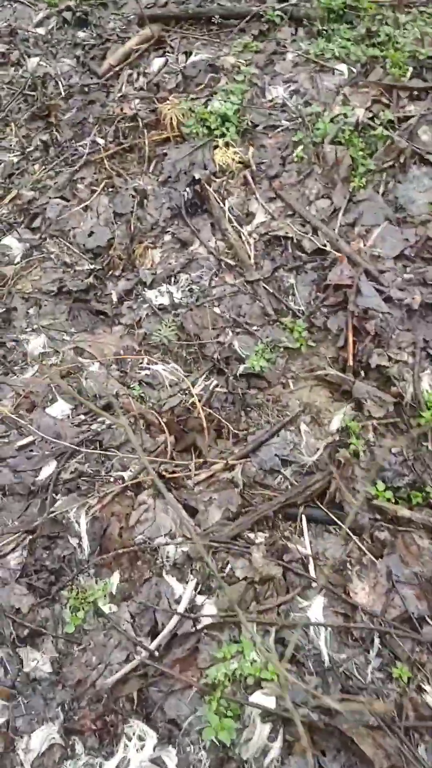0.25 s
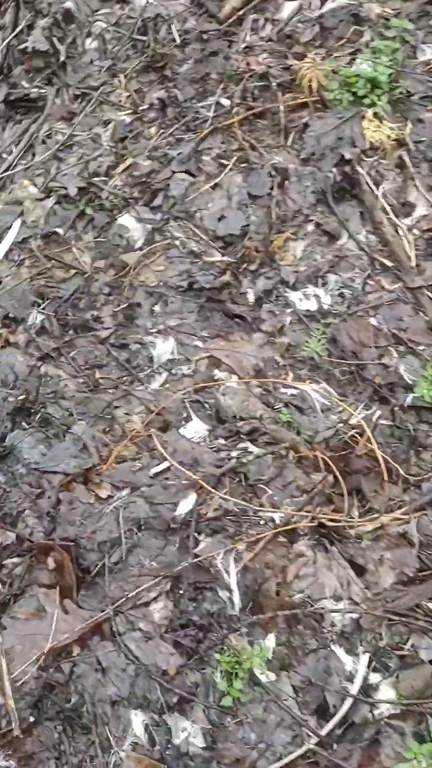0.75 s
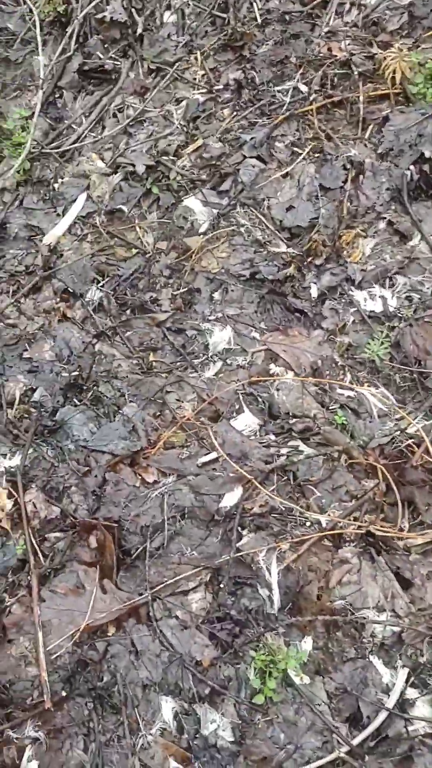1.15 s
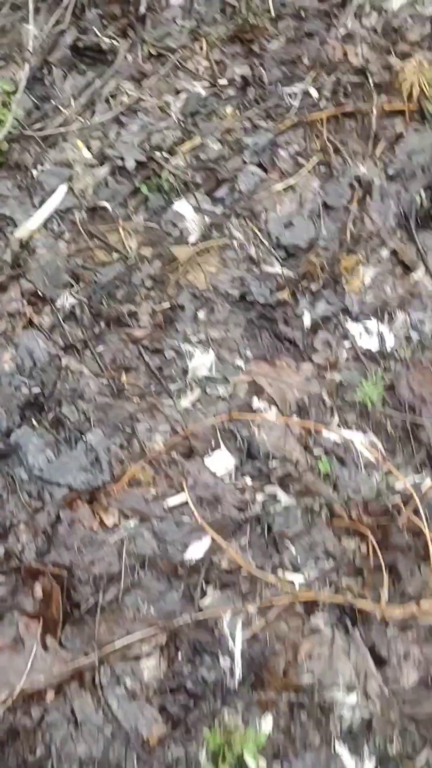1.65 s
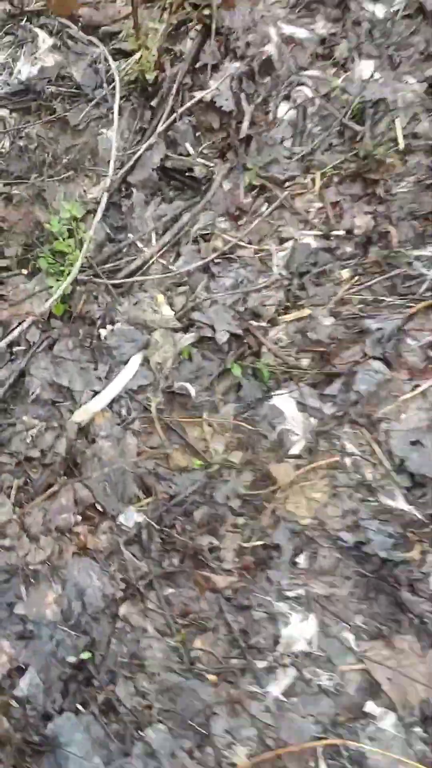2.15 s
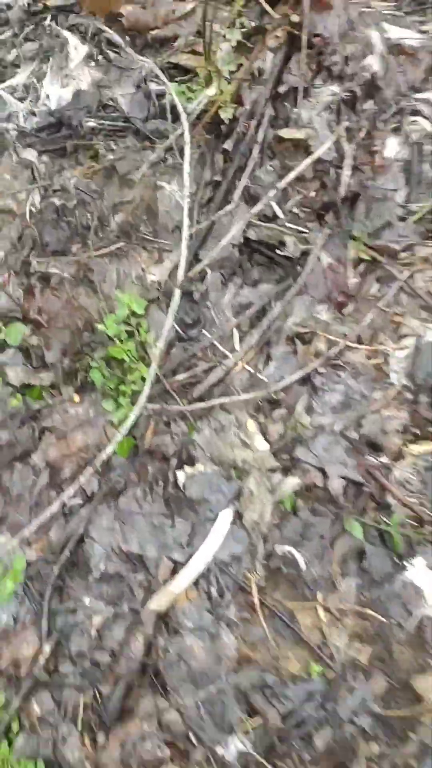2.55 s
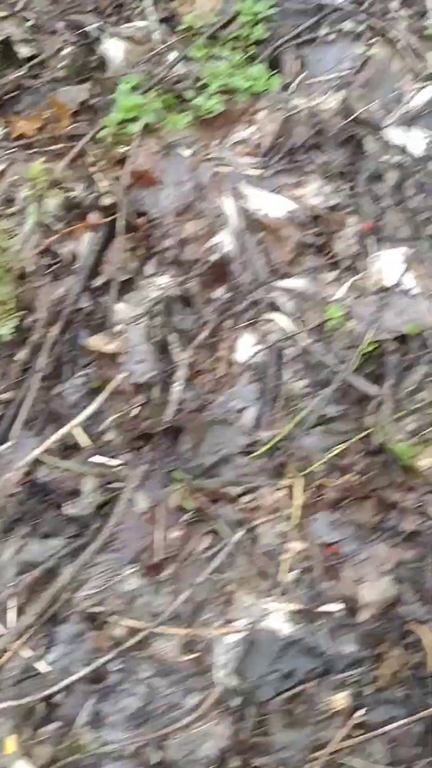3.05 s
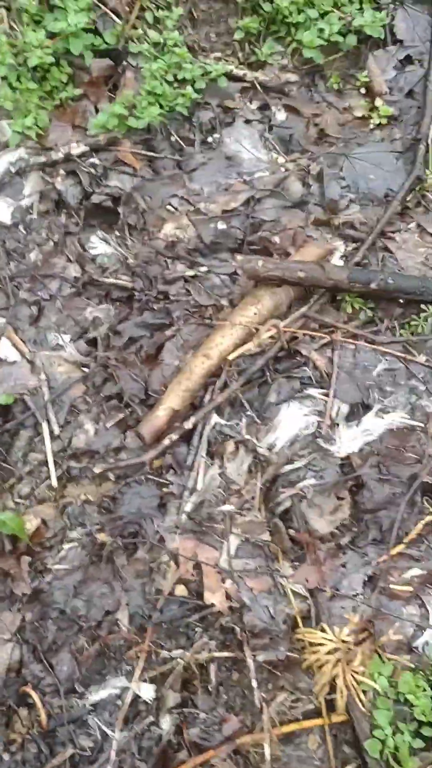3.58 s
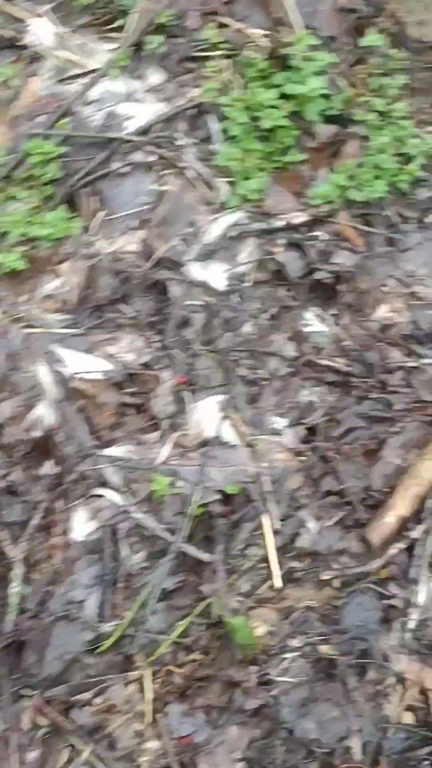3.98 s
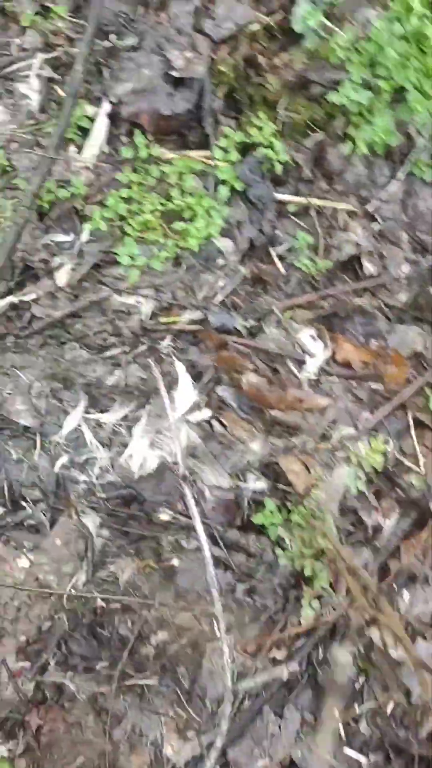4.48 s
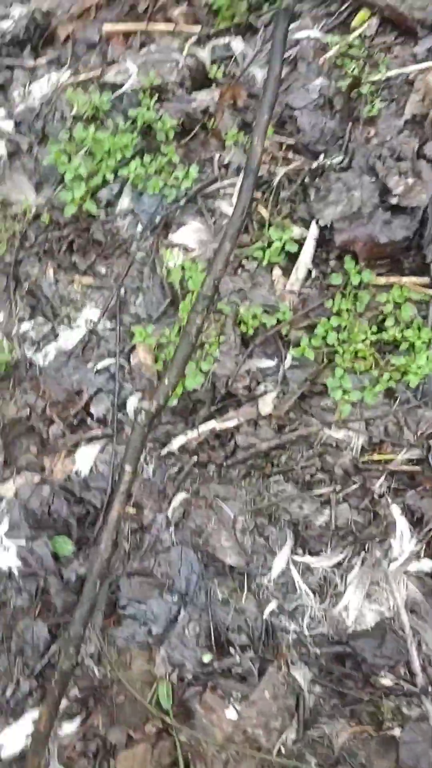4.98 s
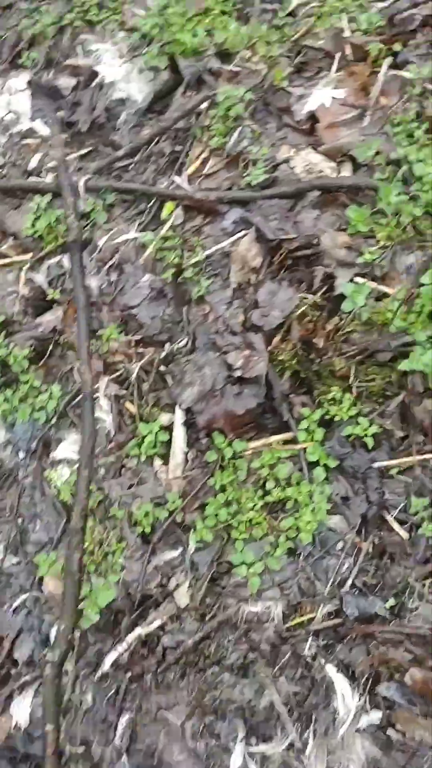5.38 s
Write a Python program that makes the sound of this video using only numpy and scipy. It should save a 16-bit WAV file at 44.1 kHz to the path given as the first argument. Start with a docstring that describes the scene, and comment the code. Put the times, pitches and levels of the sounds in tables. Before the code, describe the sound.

Slow, close footsteps on a damp forest floor, with small twigs snapping and wet leaves rustling and squashing softly.

```python
"""A damp forest floor: slow footsteps, close, from two microphone ports held above the feet.
Twigs and stems snap, the litter cracks faintly, wet pockets pop, wet leaves rustle and squash in swells.
A faint far hum and the air of the wood lie below. The left port faces the ground and hears the feet
first and brighter; the right port hears them late and shadowed."""
import sys
import numpy as np
from scipy import signal
from scipy.fft import rfft, irfft, next_fast_len
from scipy.io import wavfile
from scipy.ndimage import uniform_filter1d

SR = 44100
rng = np.random.default_rng(int(sys.argv[2]) if len(sys.argv) > 2 else 0)


def digitize_waveform(pressure):
    """Quantize a signal to 16-bit integers and store it at the path in sys.argv[1].

    Rows of a 2-D input are taken as channels; values are limited to [-1, 1].
    """
    field = np.atleast_2d(pressure).T
    bounded = np.clip(field, -1, 1)
    quanta = np.round(bounded * 32767).astype(np.int16)
    wavfile.write(sys.argv[1], SR, quanta)


N = 248283

# twigs and stems breaking underfoot: (time [s], tick level [dB], crack level [dB], crack pitch [Hz],
# body level [dB], body pitch [Hz], knock level [dB], knock pitch [Hz])
TWIG_SNAPS = [(0.2209, -34, -32, 7800, -33.5, 2390, -43, 373),
              (0.2219, -36, -19, 6500, -43, 3040, -44, 390), (0.2288, -24, -24, 3900, -41, 3900, -39, 366),
              (0.308, -33.5, -28.5, 5300, -34.5, 4200, -42.5, 560),
              (0.4793, -37, -35, 5840, -41.5, 2280, -43, 910),
              (0.5108, -33.5, -29, 3580, -35, 2070, -44.5, 820),
              (0.599, -30, -27.5, 5430, -42, 1030, -35.5, 1015),
              (0.7312, -26, -22, 5530, -32, 3920, -36, 703),
              (0.883, -61, -38, 4400, -43, 1380, -49.5, 1190),
              (1.2149, -47, -24.5, 8790, -34, 1820, -37, 695),
              (1.231, -36, -24, 7300, -40, 1280, -39.5, 625),
              (1.285, -24, -15.5, 6910, -23, 2470, -34, 474),
              (1.3694, -11.5, -15.5, 6380, -22.5, 1946, -25.5, 637),
              (1.7422, -35, -21, 9600, -42.5, 4140, -58, 470),
              (1.802, -23, -15.5, 4990, -34.5, 2490, -36, 670),
              (1.8557, -24.5, -22, 4970, -39, 2550, -47, 1000),
              (1.879, -40, -25, 7260, -42, 2900, -41.5, 437), (1.904, -24, -30, 9600, -39, 2280, -35, 895),
              (1.917, -21.5, -17, 8580, -25, 1240, -26, 1160),
              (1.939, -25.5, -16.5, 5260, -23, 2410, -40, 510),
              (2.239, -58, -47, 4000, -36, 1720, -45, 490),
              (2.3451, -53, -32.5, 6640, -40.5, 1960, -33, 870),
              (2.557, -19.5, -7, 5542, -26.5, 1750, -27.5, 367),
              (2.58, -47, -19.5, 4530, -32, 2810, -48, 920),
              (2.592, -20.5, -20.5, 5300, -41, 1480, -27, 662),
              (2.9868, -30, -15, 7840, -24, 2080, -42, 437),
              (3.072, -59, -33, 7870, -30.5, 1780, -32.5, 1215),
              (3.199, -33, -18.5, 4553, -33.5, 2430, -28, 1210),
              (3.6902, -30, -25.5, 6900, -33.5, 1260, -34.5, 333),
              (3.782, -15, -23, 5320, -22.5, 2940, -38, 385),
              (3.8096, -25.5, -31, 9050, -40, 2700, -55, 400),
              (3.819, -42, -15, 8580, -34.5, 2420, -38, 430), (3.836, -39, -20, 8100, -43, 3080, -49, 385),
              (3.8427, -33, -21, 7600, -55, 2960, -32, 695),
              (4.0026, -40, -25.5, 8300, -34, 1340, -37, 455), (4.61, -61, -30, 7000, -38, 2350, -41, 470),
              (4.816, -39.5, -38, 3790, -43, 1890, -47, 810), (4.9452, -37, -30, 4400, -40, 2770, -48, 790),
              (4.9633, -21.5, -13.5, 7370, -26.5, 2580, -28, 530),
              (5.19, -61, -33, 3620, -53, 1240, -36, 930), (5.2395, -28, -21.5, 3320, -25, 1570, -33, 1020),
              (5.3556, -35, -29.5, 7740, -31, 1390, -36.5, 1020),
              (5.441, -26, -45, 8950, -40, 2890, -41.5, 561),
              (5.447, -46, -33, 7060, -40.5, 2480, -44, 1042),
              (5.5501, -46, -24.5, 6900, -40.5, 3260, -72, 993)]
# wet pockets bursting under the sole: (time [s], level [dB], pitch [Hz])
WET_POPS = [(0.132, -46.5, 580), (0.263, -42.5, 254), (0.322, -45, 636), (1.132, -34, 280),
            (1.0764, -41, 487), (1.1562, -36, 940), (1.474, -32.5, 430), (1.505, -37.5, 400),
            (1.5215, -37.5, 397), (1.601, -43.5, 250), (2.038, -39.5, 189), (2.23, -43.5, 330),
            (2.561, -34.5, 165), (3.8455, -46, 730), (3.8542, -34.5, 780), (3.8742, -38, 810),
            (3.941, -39.5, 294), (4.247, -48, 654), (4.628, -46.5, 394), (5.33, -41, 460),
            (5.3865, -43, 252), (5.402, -37, 350)]
# faint, short cracks and ticks in the litter underfoot, and at 2.5635 s a faint echo off the ground of the loud
# snap just before: (time [s], level [dB], pitch [Hz])
FAINT_CRACKS = [(0.0075, -36, 4430), (0.0125, -36.5, 7840), (0.1302, -38.5, 5600), (0.4405, -42.5, 7900),
                (0.4674, -53, 7340), (1.078, -40.5, 2180), (1.109, -37, 2960), (1.226, -35.5, 4500),
                (1.4283, -42.5, 2800), (2.042, -44, 7550), (2.1515, -40.5, 4030), (2.2455, -39, 2630),
                (2.266, -41.5, 5100), (2.5635, -42, 6500), (3.048, -40, 8240), (3.14, -47, 6740),
                (3.16, -49, 7640), (3.181, -35.5, 7040), (3.347, -41.5, 4000), (3.441, -33.5, 7740),
                (3.5142, -36, 2180), (3.581, -38.5, 5100), (3.6996, -40, 4560), (3.8165, -32, 9000),
                (3.877, -48, 5670), (3.9154, -43.5, 3350), (4.0526, -34, 5030), (4.1375, -42.5, 2800),
                (4.5786, -38.5, 6900), (4.6135, -40, 3400), (4.6275, -44, 5460), (4.685, -46.5, 7000),
                (4.9046, -41.5, 2600), (5.205, -38, 11400), (5.321, -44, 4100), (5.334, -39, 7700),
                (5.3495, -32, 4880), (5.4312, -34, 5430)]
# where the foot is, heard as lag at the right port: (time [s], lag [ms])
FOOT_LAG = [(0, 0.31), (1.2, 0.49), (1.9, 0.4), (2.3, 0.5), (3.1, 0.54), (3.9, 0.37), (4.98, 0.34),
            (5.2, 0.43)]
# the sole pressing into the leaves:
# (time of full pressure [s], hold [s], relative rustle level [dB], relative squash level [dB])
SOLE_PRESSES = [(0.005, 0.0037, -52, -48.5), (0.165, 0.031, -52.5, -76), (0.217, 0.019, -48, -72),
                (0.453, 0.014, -57.5, -58), (0.922, 0.069, -58.5, -63), (1.108, 0.032, -45.5, -45),
                (1.46, 0.042, -65, -50), (1.883, 0.11, -53, -52), (2.231, 0.011, -56, -42.5),
                (2.553, 0.011, -48, -58), (3.063, 0.025, -54.5, -75), (3.413, 0.093, -55, -77),
                (3.796, 0.067, -49, -42.5), (4.614, 0.0084, -51, -55), (5.095, 0.017, -57.5, -78),
                (5.342, 0.079, -52, -58), (5.554, 0.012, -49, -44.5)]
# litter shifting under the walker: (time [s], relative rustle level [dB], relative squash level [dB])
LITTER_SHIFT = [(0.0, -69, -68), (0.3, -59.5, -58.5), (0.55, -66, -68), (0.7, -66, -66.5),
                (0.85, -61.5, -64.5), (1.2, -55, -63.5), (1.41, -57.5, -50), (1.58, -63.5, -55.5),
                (1.68, -54.5, -53.5), (2.1, -58, -53.5), (2.5, -59.5, -55.5), (2.98, -54.5, -54.5),
                (3.3, -63.5, -54), (3.72, -60.5, -58), (3.931, -54.5, -50), (4.32, -60, -51.5),
                (4.5, -68.5, -61.5), (4.68, -60.5, -59), (5.05, -56, -60.5), (5.17, -64.5, -58),
                (5.63, -54, -51.5)]
# spectrum of sliding leaves: (frequency [Hz], relative level [dB])
RUSTLE_SPECTRUM = [(400, -31), (800, -8), (3500, -2.5), (6000, 2.5), (7800, 4.5), (9500, 1.5), (15500, 0.5)]
# strength of the wet layers' resonances: (frequency [Hz], relative level [dB])
SQUASH_SPECTRUM = [(120, -15.5), (300, 0.5), (600, -3.5), (1300, 1.5)]
# shadow on the leaves at the right port: (frequency [Hz], gain [dB])
PORT_SHADOW = [(60, -4), (400, -1.5), (1300, -4), (4400, -5.5), (8000, -8.5), (15000, -4.5)]
# spectrum of the air in the wood: (frequency [Hz], relative level [dB])
AIR_SPECTRUM = [(20, -43), (50, -9.5), (80, 1.5), (110, 2.5), (200, -11.5), (1140, -19), (2200, -20.5),
                (8000, -19.5), (11000, -25.5), (15500, -25)]
# how alike the air is at the two ports: (frequency [Hz], correlation [0-1])
AIR_CORRELATION = [(60, 0.92), (300, 0.1), (1500, 0.031), (8000, 0.0067)]
# resonance of the far drone: (frequency [Hz], width [Hz], level [dB])
HUM_RESONANCES = [(86.6, 16, -76)]

CRACK_SHADOW_DB, BODY_SHADOW_DB, KNOCK_SHADOW_DB = -17, -7.5, -4   # at the right port
PRESS_S, LIFT_S = 0.051, 0.058   # a press swells, and dies, by 20 dB in these times
SHORT = 3000   # samples in one short sound
SHORT_T = np.arange(SHORT) / SR


def twig_snaps():
    """Twigs break close below the microphone: bright crack, woody body, dull knock, litter settling."""
    out = np.zeros((2, N))
    for s, tick_db, crack_db, crack_hz, body_db, body_hz, knock_db, knock_hz in TWIG_SNAPS:
        crack = 0.47 * burst(0.00029, 0.0034, 0.7 * crack_hz, min(1.616 * crack_hz, 16500))
        crack += 0.36 * tearing(crack_hz)
        tick = amp(tick_db) * (1.21 * click(6700, 15280) + 0.067 * burst(0.00048, 0.077, 7700, 15000))
        crack += amp(-32.5) * burst(0.00043, 0.1, 2200, 13600)   # the litter settles
        body = 1.1 * burst(0.0008, 0.007, 0.65 * body_hz, 1.5 * body_hz)
        body += 2.6 * ring(body_hz, t60=0.0055, glide=0.17)
        knock = dull_knock(knock_hz) + 0.31 * ring(201, t60=0.011, glide=0.98)   # low push of the weight
        scatter = burst(0.00013, 0.02, 0.42 * crack_hz, 11850)   # reaches the right port round the hand
        parts = amp([[crack_db], [body_db], [knock_db]]) * [crack, body, knock]
        right = amp([CRACK_SHADOW_DB, BODY_SHADOW_DB, KNOCK_SHADOW_DB]) @ parts
        right += amp(crack_db + CRACK_SHADOW_DB) * scatter
        right += amp(-8.5) * tick   # the very top bends past the shadow
        add_at_ports(out, s, parts.sum(axis=0) + tick, right)
    return out


def tearing(hz, peak_s=0.0013):
    """A crack runs through a stem: an unsteady tone that swells, sweeps down to its pitch and dies."""
    wobble = np.cumsum(rng.normal(0, 0.07, size=SHORT))
    sweep = 0.000495 * (1 - np.exp(-SHORT_T / 0.00056))
    envelope = (SHORT_T / peak_s * np.exp(1 - SHORT_T / peak_s)) ** 2.05
    return np.sin(2 * np.pi * hz * (SHORT_T + sweep) + wobble) * envelope


def burst(rise_s, t60, low_hz, high_hz):
    """Fibres tear in a spurt of noise that swells and dies, its highest treble first."""
    envelope = (1 - np.exp(-SHORT_T / rise_s)) ** 2 * amp(-60 * SHORT_T / t60)
    noise = rng.standard_normal(SHORT) * envelope
    spurt = falling(bandpass(noise, low_hz, high_hz, order=3), high_hz)
    return spurt / np.sqrt(uniform_filter1d(spurt ** 2, size=44).max() * 2)


def click(low_hz, high_hz):
    """One dry click falls through the band, three fibres giving way just after it."""
    impulses = np.zeros(SHORT)
    impulses[[0, *rng.integers(4, 40, size=3)]] = [1, *rng.uniform(-.45, .45, size=3)]
    x = falling(bandpass(impulses, low_hz, high_hz), high_hz)
    return x / np.abs(x).max()


def ring(hz, t60, glide, lag_s=0.00069):
    """A broken end rings briefly after lag_s, its pitch dropping as the crack opens."""
    t = np.maximum(SHORT_T - lag_s, 0)
    phase = 2 * np.pi * hz * (t + glide * 0.00067 * (1 - np.exp(-t / 0.00027)))
    return np.sin(phase) * (1 - np.exp(-t / 0.0008)) * amp(-60 * t / t60)


def dull_knock(hz):
    """A thud of noise over a short ring that drops in pitch."""
    noise = burst(0.0005, 0.012, 0.45 * hz, 2.4 * hz)
    return 0.75 * noise + 1.7 * ring(hz, t60=0.011, glide=0.8, lag_s=0)


def falling(x, top_hz, floor_hz=2500, s_per_octave=0.0009):
    """A break starts bright and falls: each octave from top_hz down to floor_hz arrives later."""
    hz = np.fft.rfftfreq(2 * SHORT, 1 / SR)
    octaves_down = np.log2(max(top_hz, floor_hz) / np.maximum(hz, floor_hz)).clip(0)
    phase = 2 * np.pi * np.cumsum(s_per_octave * octaves_down) * hz[1]
    return irfft(rfft(x, 2 * SHORT) * np.exp(-1j * phase))[:SHORT]


def wet_pops():
    """Wet pockets burst dully under the sole."""
    out = np.zeros((2, N))
    for s, level_db, hz in WET_POPS:
        thud = 0.8 * dull_knock(hz) + 0.45 * burst(0.002, 0.022, 150, 750)
        pop = amp(level_db) * (thud + 0.15 * burst(0.0005, 0.006, 1100, 3000))
        add_at_ports(out, s, pop, amp(KNOCK_SHADOW_DB) * pop)
    return out


def faint_cracks():
    """Small snaps in the litter underfoot crack and tick, one a faint ground echo of a loud snap, with sixty
    barely heard ones at random."""
    out = np.zeros((2, N))
    draws = rng.uniform([0.002, -58, 0], [N / SR - 0.008, -47.5, 2.2], size=(60, 3))
    faintest = [(s, level_db, 1800 * 2 ** octaves) for s, level_db, octaves in draws]
    for s, level_db, hz in [*FAINT_CRACKS, *faintest]:
        fizz = 0.75 * burst(0.00092, 0.011, 0.5 * hz, min(1.657 * hz, 17000))
        edge = 0.7 * click(0.66 * hz, min(2.12 * hz, 16000))
        tone = 1.3 * ring(hz, t60=0.0024, glide=0.31, lag_s=0)
        crack = amp(level_db) * (fizz + edge + tone)
        add_at_ports(out, s, crack, amp(-9) * crack)
    return out


def wet_leaves():
    """Leaves slide in a patchy rustle over the squash, late and shadowed at the right port."""
    rustle_db, squash_db = tread_levels()
    # three rows: heard at both ports, left only, right only
    friction = np.array([grains(per_s=16000, spread_db=4.0) for _ in range(3)])
    rustle = unit_rms(colour(friction, RUSTLE_SPECTRUM))
    flicker_db = 1.5 * drift(90) + 2.2 * drift(300)
    bands = [(500, 2500, -0.23), (2500, 5500, 0.19), (5500, 10000, 0.22), (10000, 20000, 0.46)]
    patches = 0
    for low_hz, high_hz, brighten in bands:
        small_ticks = 0.49 * grains(per_s=490, spread_db=4.5) * [[1], [0], [0]]
        band = bandpass(rustle + small_ticks, low_hz, high_hz)
        band_db = rustle_db + brighten * (rustle_db + 35)   # a harder tread is brighter
        band *= amp(band_db + flicker_db + 2.2 * drift(25))
        patches = band - patches   # signs alternate so that neighbouring bands join
    wet = squash() * amp(squash_db - 9.5 + 0.86 * drift(40))
    left, right = 0.53 * patches[0] + 1.347 * patches[1:] + wet
    return np.array([left, colour(right, PORT_SHADOW, lag_s=17 / SR)])


def squash(ring_cycles=5):
    """Wet layers give way in dull pops, each ringing a few cycles at a pitch of its own."""
    out = 0
    for hz in np.geomspace(150, 1200, num=10):
        decay = amp(-60 * hz / (ring_cycles * SR))
        pops = grains(per_s=110, spread_db=4.5) + 0.086 * rng.standard_normal(N)
        soft_contact = signal.lfilter([1], [1, -decay], pops)
        ringing = signal.lfilter([1, -1], resonance(hz, decay), soft_contact)
        out += amp(at_hz(SQUASH_SPECTRUM, hz)) * unit_rms(ringing)
    return unit_rms(out)


def tread_levels():
    """Rustle and squash levels in dB: each press swells, holds and dies over the shifting litter."""
    t = np.arange(N) / SR
    shift_s, *shift_db = np.transpose(LITTER_SHIFT)
    power = amp([np.interp(t, shift_s, level_db) for level_db in shift_db]) ** 2
    for s, hold_s, *press_db in SOLE_PRESSES:
        before = np.maximum(s - t, 0) / PRESS_S
        after = np.maximum(t - s - hold_s, 0) / LIFT_S
        loss_db = 20 * (before + after) ** 1.03
        power += amp(np.c_[press_db] - loss_db) ** 2
    return 10 * np.log10(power)


def forest_air(level_db=-67):
    """Low rumble and faint hiss of the wood, alike at both ports only in the bass."""
    mid, side = rng.standard_normal((2, N))
    mid = colour(mid, [(hz, 10 * np.log10(1 + alike)) for hz, alike in AIR_CORRELATION])
    side = colour(side, [(hz, 10 * np.log10(1 - alike)) for hz, alike in AIR_CORRELATION])
    return amp(level_db) * unit_rms(colour(np.array([mid + side, mid - side]), AIR_SPECTRUM))


def far_hum():
    """A distant drone, the same at both ports: noise in a narrow low resonance."""
    out = 0
    for hz, width_hz, level_db in HUM_RESONANCES:
        decay = np.exp(-np.pi * width_hz / SR)
        drone = signal.lfilter([1, 0, -1], resonance(hz, decay), rng.standard_normal(N))
        out += amp(level_db) * unit_rms(drone)
    return out


def add_at_ports(out, s, left, right):
    """Mix in a short sound from 1 ms before s; the right port lags by where the foot is."""
    start = round((s - 0.001) * SR)
    lag_ms = np.interp(s, *np.transpose(FOOT_LAG))
    for port, at, x in zip(out, [start, start + round(lag_ms / 1000 * SR)], [left, right]):
        port[at:at + SHORT] += x[:N - at]


def grains(per_s, spread_db):
    """Random clicks, many small and few large."""
    sizes = amp(spread_db * np.minimum(rng.exponential(1, N), 5)) * rng.choice([-1, 1], N)
    return sizes * (rng.random(N) < per_s / SR)


def drift(per_s):
    """A wandering line through per_s random values a second."""
    knots = rng.standard_normal(int(N / SR * per_s) + 2)
    return np.interp(np.arange(N) / SR * per_s, np.arange(len(knots)), knots)


def colour(x, spectrum, lag_s=0):
    """Shape x by a spectrum and delay it."""
    size = next_fast_len(N + 4096)
    hz = np.fft.rfftfreq(size, 1 / SR)
    response = amp(at_hz(spectrum, hz)) * np.exp(-2j * np.pi * hz * lag_s)
    return irfft(rfft(x, size) * response, size)[..., :N]


def at_hz(spectrum, hz):
    """Read a spectrum's level on a log-frequency axis."""
    knots_hz, levels_db = np.transpose(spectrum)
    return np.interp(np.log(np.maximum(hz, 1)), np.log(knots_hz), levels_db)


def bandpass(x, low_hz, high_hz, order=2):
    """Keep one band of x."""
    return signal.sosfilt(signal.butter(order, [low_hz, high_hz], "band", fs=SR, output="sos"), x)


def resonance(hz, decay):
    """Feedback terms of a resonator whose ring shrinks by the factor decay each sample."""
    return [1, -2 * decay * np.cos(2 * np.pi * hz / SR), decay ** 2]


def amp(db):
    """Gain of a level in dB."""
    return 10 ** (np.asarray(db) / 20)


def unit_rms(x):
    """Scale to rms 1."""
    return x / np.sqrt(np.mean(x ** 2) + 1e-20)


def scene():
    """Feet close below the microphone, the wood around and far off."""
    return twig_snaps() + wet_pops() + faint_cracks() + wet_leaves() + forest_air() + far_hum()


def record(dry):
    """The microphone loses the deep bass and falls off at the top, which is then cut steeply."""
    bass_hz, top_hz, cutoff_hz = 55, 15300, 16900
    x = signal.sosfilt(signal.butter(2, bass_hz, "high", fs=SR, output="sos"), dry)
    x = signal.sosfilt(signal.butter(14, top_hz, fs=SR, output="sos"), x)
    return signal.sosfilt(signal.cheby2(12, 60, cutoff_hz, fs=SR, output="sos"), x)


dry = scene()
out = record(dry)
digitize_waveform(out)
```